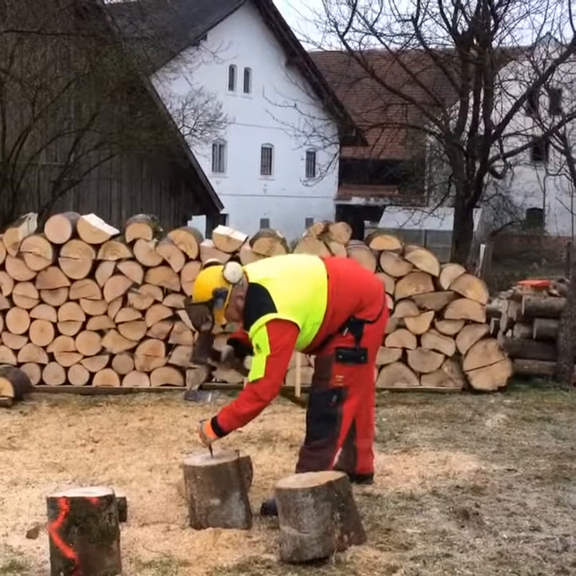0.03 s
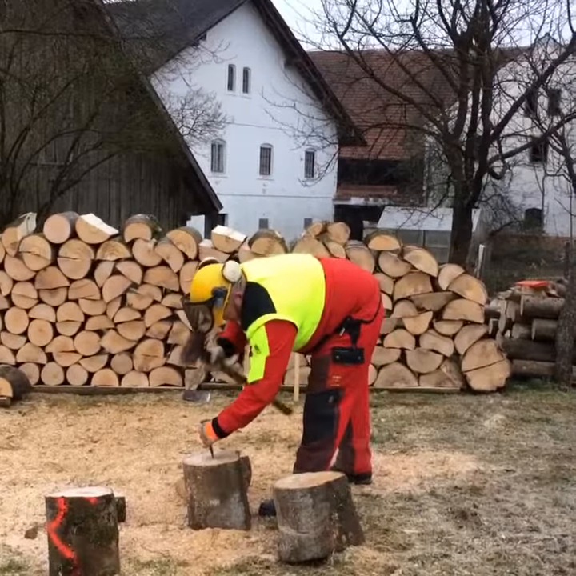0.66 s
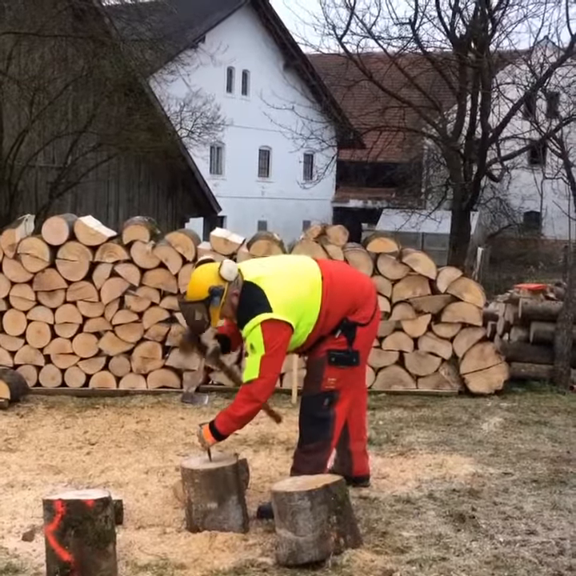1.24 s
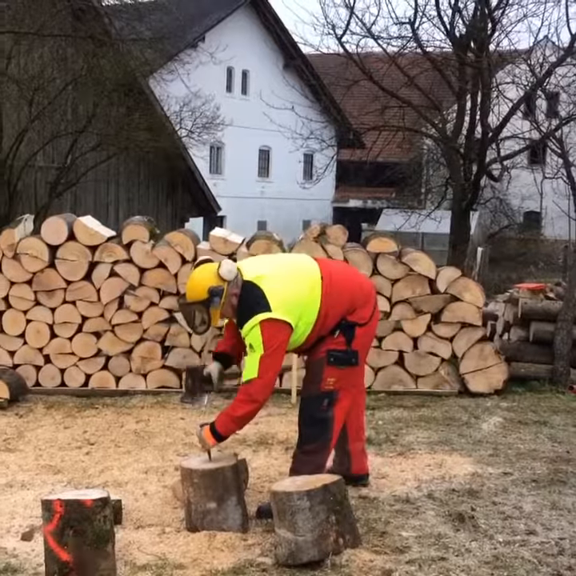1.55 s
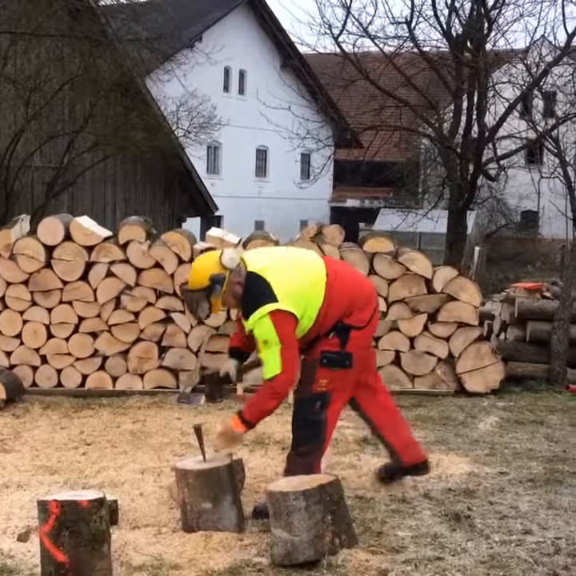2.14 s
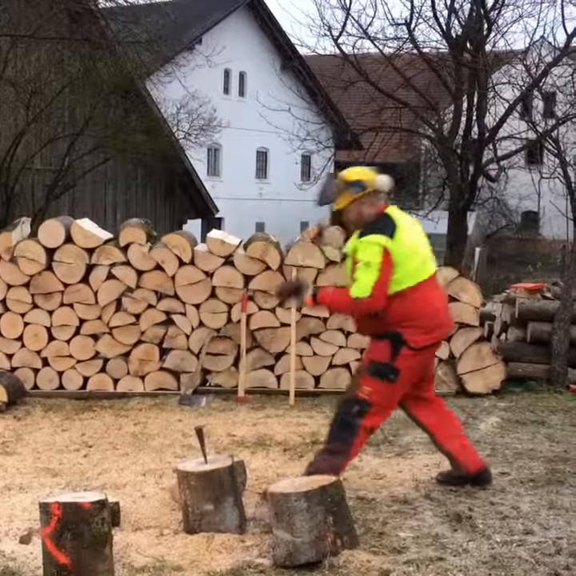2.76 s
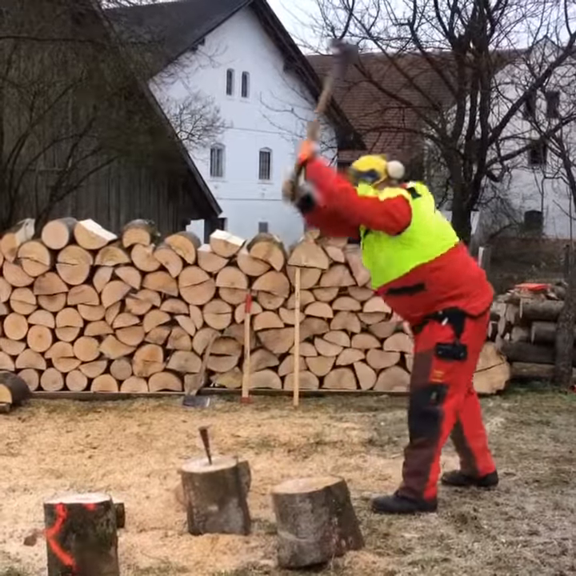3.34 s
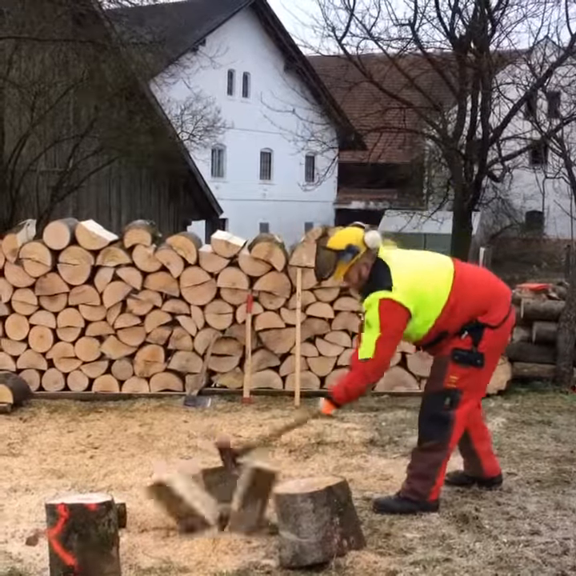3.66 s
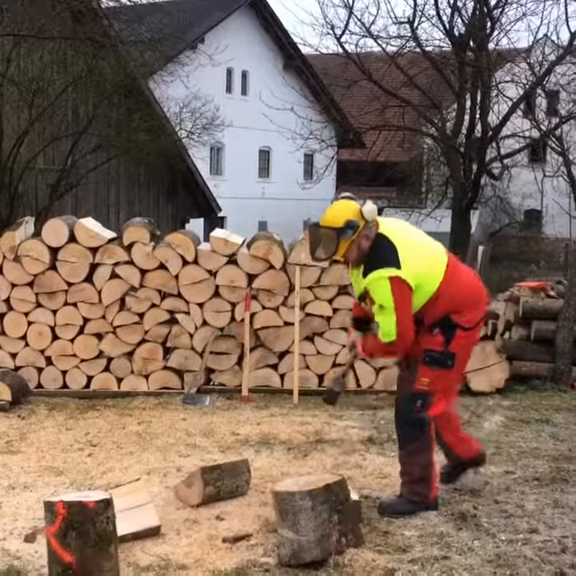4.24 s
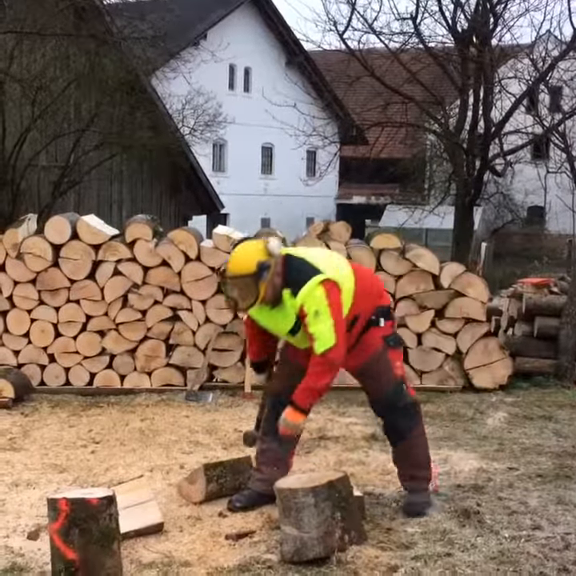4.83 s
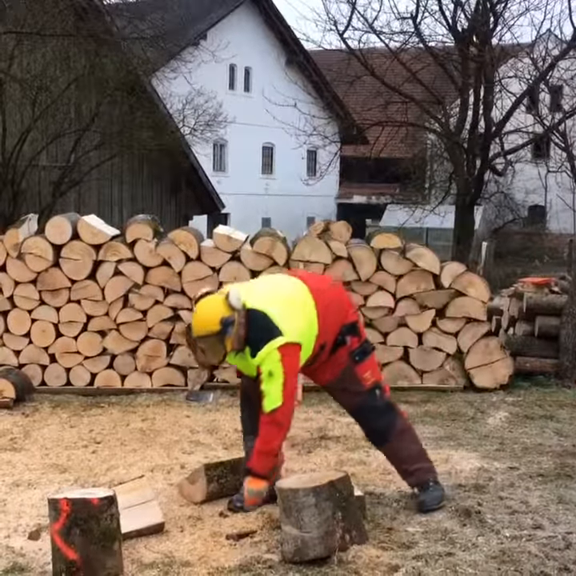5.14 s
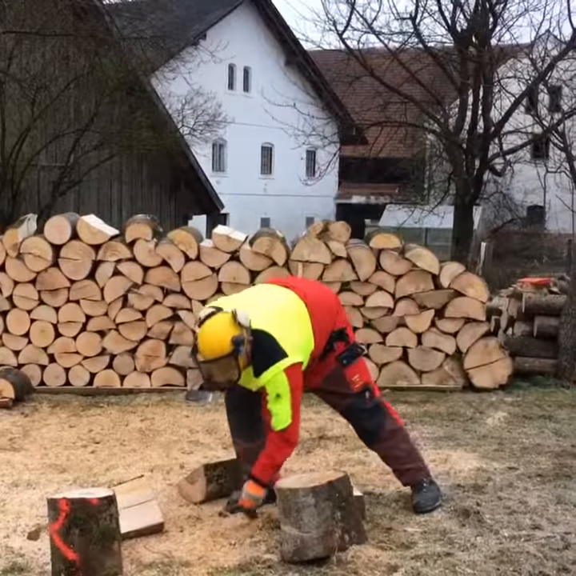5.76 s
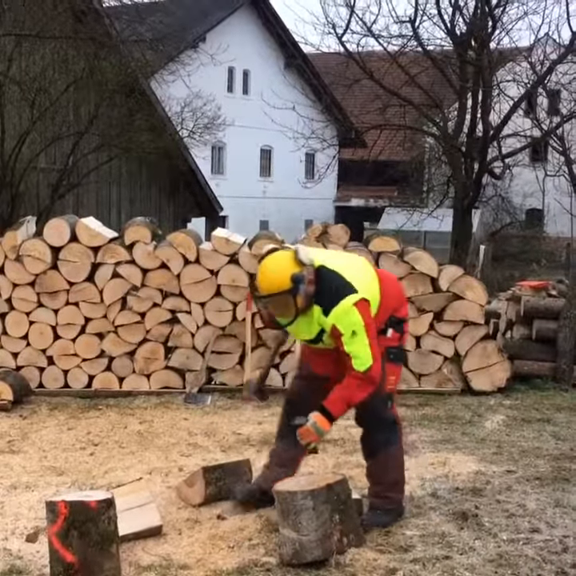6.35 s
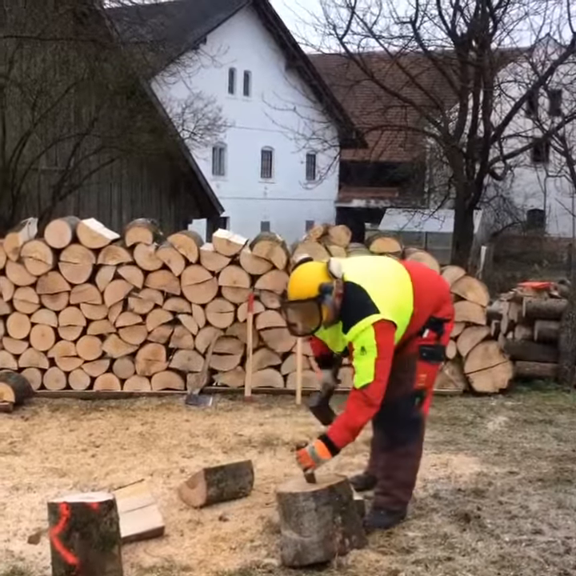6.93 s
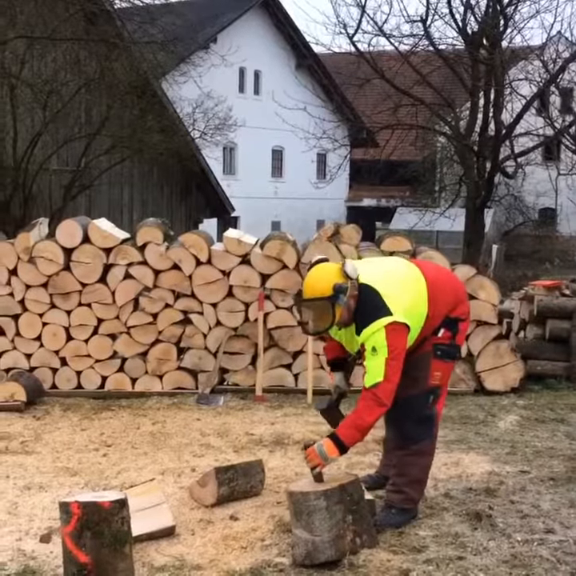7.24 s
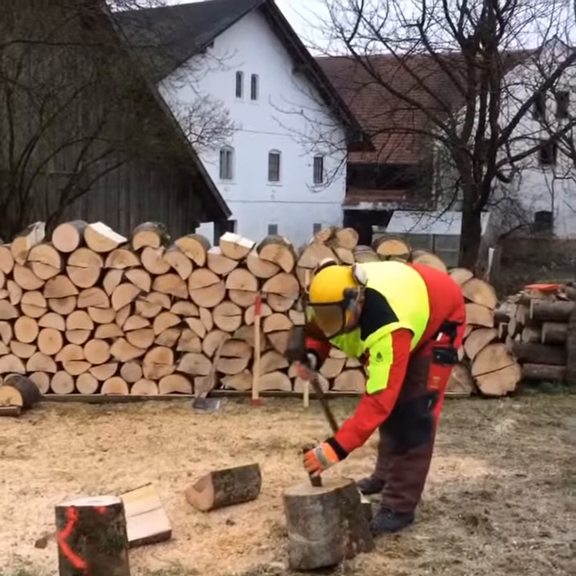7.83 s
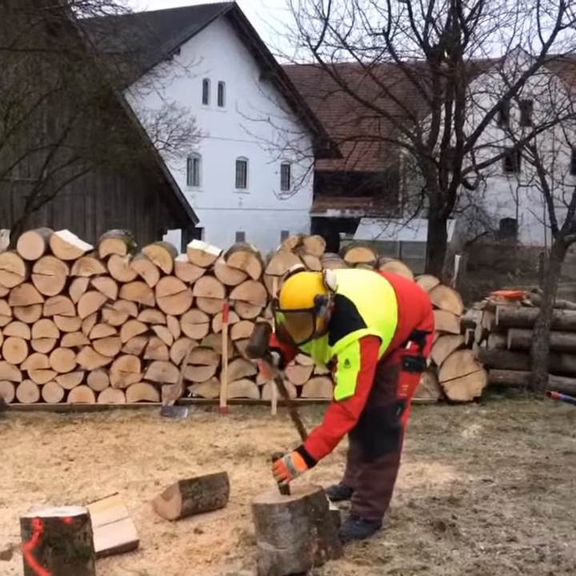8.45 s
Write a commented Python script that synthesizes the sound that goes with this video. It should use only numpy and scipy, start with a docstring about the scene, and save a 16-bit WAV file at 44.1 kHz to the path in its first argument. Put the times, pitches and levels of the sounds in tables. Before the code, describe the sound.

A hammer taps a steel wedge into a log with ringing clacks, then one heavy blow cracks the wood apart outdoors.

```python
"""Farmyard, beside a woodpile. A hammer taps a steel wedge into a log: each blow clacks and rings
the steel and thumps the wood. One full swing tears the fibres, the log booms and the wedge flies out
ringing. The halves tumble, boots shift on sawdust, and the wedge is set and struck on a second log.
The woodpile throws each blow straight back; farm buildings answer up to a third of a second later.
Under it all lie a faint rumble, a far roar and a hiss."""
import sys
import numpy as np
from scipy import signal
from scipy.fft import rfft, irfft, next_fast_len
from scipy.io import wavfile
from scipy.ndimage import uniform_filter1d

SR = 44100
rng = np.random.default_rng(int(sys.argv[2]) if len(sys.argv) > 2 else 0)


def pcm_store(signal):
    """Save signal as 16-bit PCM."""
    levels = np.round(np.clip(np.atleast_2d(signal), -1, 1) * 32767)
    wavfile.write(sys.argv[1], SR, levels.astype(np.int16).T)


N = 374409


def amp(db):
    """Decibels to gain."""
    return 10 ** (np.asarray(db) / 20)


def unit_rms(x):
    """Scale to rms 1."""
    return x / np.sqrt(np.mean(x ** 2) + 1e-20)


def spectrum_db(points, hz):
    """Spectrum interpolated over log frequency."""
    point_hz, db = np.transpose(points)
    return np.interp(np.log(hz + 1), np.log(point_hz + 1), db)


def add(mix, time_s, sound):
    """Mix a sound in at time_s."""
    part = mix[max(round(time_s * SR), 0):][:len(sound)]
    part += sound[:len(part)]


def noise(points):
    """Steady noise with the given spectrum, rms 1."""
    size = next_fast_len(N, True)
    gain = amp(spectrum_db(points, np.fft.rfftfreq(size, 1 / SR)))
    return unit_rms(irfft(rfft(rng.standard_normal(size)) * gain, size)[:N])


def grains(depth_db, samples):
    """Fast random gain that makes noise crackle."""
    jitter = unit_rms(uniform_filter1d(rng.standard_normal(N), size=samples))
    return unit_rms(amp(depth_db * jitter))


def minimum_phase(x, bin_db):
    """Causal filter; attacks stay sharp."""
    cepstrum = irfft(np.log(amp(bin_db)))
    cepstrum[1:len(x) // 2] *= 2
    cepstrum[len(x) // 2 + 1:] = 0
    return irfft(rfft(x) * np.exp(rfft(cepstrum)))


def flat_burst(envelope):
    """Enveloped noise, iterated toward a flat spectrum."""
    x = rng.standard_normal(len(envelope))
    envelope_rms = np.sqrt(np.mean(envelope ** 2))
    for _ in range(4):
        bins = rfft(x * envelope)
        white = unit_rms(irfft(bins / (abs(bins) + 1e-12)))
        x = np.tanh(white * envelope_rms / (envelope + 1e-6) / 2)
    return x * envelope


def ring(modes, rise_s):
    """Decaying modes with a soft onset."""
    t = np.arange(12000) / SR
    tones = sum(amp(db - 60 * t / t60_s) * np.sin(2 * np.pi * (hz * t + rng.random()))
                for hz, db, t60_s in modes)
    return tones * (1 - np.exp(-(t / rise_s) ** 2))


# Hammer blows: (time [s], impact gain [dB], wedge seating [0-1], bending note [Hz], its level [dB],
# upper note [Hz], its level [dB], woodpile delay [s])
BLOWS = [(0.2995, -10, 0.2, 1640, -27.5, 4420, -14, 0.017),
         (0.8710, -10, 0.58, 1292, -17, 4300, -19, 0.018), (1.4791, -8, 0.8, 1419, -15.5, 5160, -15, 0.018),
         (2.0194, -9, 0.97, 1512, -10, 4907, -13, 0.017),
         (3.6839, -8.5, 0.6, 1810, -22, 4661, -20.5, .0172),
         (8.0714, -8.5, 0.03, 1125, -25.5, 3735, -13, 0.018)]
# Modes: (frequency [Hz], level [dB], t60 [s])
STEEL_MODES = [(867, -21.5, 0.082), (1793, -15.5, 0.065), (3081, -9.5, 0.029), (3440, -19.5, .07),
               (4390, -17, 0.061), (6020, -22, .08), (7610, -17, .06), (7810, -22.5, 0.072),
               (8730, -24, 0.063), (9600, -26, .09), (13560, -26, .06), (12950, -26, .06)]  # hammer head and wedge
GRIPPED_MODES = [(966, -17, 0.033), (2350, -14, .035), (3040, -6, 0.021), (3480, -14, 0.025),
                 (4200, -12, .022), (5140, -7, .016), (5650, -15, 0.018)]  # wedge held by the wood
WHOLE_LOG_MODES = [(414, -35, .2), (856, -26.5, 0.16), (1087, -14, 0.044), (1480, -25, .1),
                   (1910, -25, .064), (2460, -18, .035), (2760, -21, .035), (3440, -11, 0.0325),
                   (3750, -18.5, .03), (4400, -17, .035)]  # second log with its loose wedge
def hammer():
    """Blows ring the steel and bend the wedge, which sounds two close notes and an upper one."""
    out = np.zeros(N)
    for time_s, db, seating, bend_hz, bend_db, upper_hz, upper_db, pile_delay_s in BLOWS:
        impact = ring(STEEL_MODES, rise_s=0.001) + seating * ring(GRIPPED_MODES, rise_s=0.001)
        add(impact, 0, amp(-1.5) * clack(seating))
        wedge_modes = [(bend_hz, bend_db, 0.083), (bend_hz * 1.08, bend_db - 5, 0.03),
                       (upper_hz, upper_db, 0.038)]
        notes = ring(wedge_modes, rise_s=0.0016)
        add(out, time_s, yard(amp(db) * impact + notes, pile_delay_s))
    add(out, BLOWS[-1][0], ring(WHOLE_LOG_MODES, rise_s=0.0031))
    return out


# Clack spectra, wedge loose and seated: (frequency [Hz], relative level [dB])
LOOSE_SPECTRUM = [(100, -22), (250, -26), (560, -10), (1100, -5), (1700, -3.5), (2200, -5), (2900, -6.5),
                  (3500, 1.5), (4300, 5), (4900, -7.5), (8000, -12), (10500, -20.5), (13000, -15),
                  (15500, -24)]
SEATED_SPECTRUM = [(100, -12), (350, -19.5), (600, -11.5), (900, -7), (1100, -12), (1600, 1), (2500, -6),
                   (3050, -0.5), (3800, -5.5), (5000, 3), (6000, -5.5), (9500, -8), (11000, -17.5),
                   (15500, -18.5)]
def clack(seating, contact_s=0.0032, fade_s=0.0021, size=4096):
    """Steel chatters on steel; the colour shifts as the wood grips the wedge."""
    t, hz = np.arange(size) / SR, np.fft.rfftfreq(size, 1 / SR)
    envelope = np.minimum(0.5 + t / contact_s, 1) * np.exp(-np.maximum(t - contact_s, 0) / fade_s)
    loose_db, seated_db = spectrum_db(LOOSE_SPECTRUM, hz), spectrum_db(SEATED_SPECTRUM, hz)
    chatter = minimum_phase(flat_burst(envelope), (1 - seating) * loose_db + seating * seated_db)
    return unit_rms(chatter) * np.sqrt(np.mean(envelope ** 2))


# Tearing fibres: (frequency [Hz], relative level [dB])
TEAR_SPECTRUM = [(40, -20.5), (180, 1), (300, -1), (600, 2), (800, -13), (1800, -4.5), (2600, -11.5),
                 (4000, -9), (8000, -11), (15000, -17.5)]
# Modes: (frequency [Hz], level [dB], t60 [s])
BOOM_MODES = [(66, -23, 0.099), (175, -22, .12), (232, -22, .12)]  # opening log and soil
FREE_WEDGE_MODES = [(7550, -1.5, 0.11), (7500, -13, 0.14), (7840, -12, .08), (9530, -17, .08),
                    (6260, -18, .09)]
def split(split_s=3.684, crack_s=0.058, freed_s=3.710, sag_db_per_s=185, release_db_per_s=480):
    """Fibres snap, fading fast once the crack is through; the log booms and the freed wedge rings."""
    age_s = np.arange(N) / SR - split_s
    sag_db = sag_db_per_s * np.clip(age_s, 0, crack_s)
    release_db = release_db_per_s * np.maximum(age_s - crack_s, 0)
    envelope = amp(-20 - sag_db - release_db) * (age_s >= 0)
    out = grains(depth_db=4, samples=60) * noise(TEAR_SPECTRUM) * envelope
    out += barn_echo(out)
    add(out, split_s, ring(BOOM_MODES, rise_s=0.004))
    add(out, freed_s, amp(-2) * ring(FREE_WEDGE_MODES, rise_s=0.0045))
    return out


# Log bursts, halves tumble, a boot lands, wedge is set on the next log: (time [s], level [dB], pitch [Hz], t60
# [s])
KNOCKS = [(3.684, -9.5, 259, .024), (3.717, -13, 390, .015), (3.736, -21, 983, 0.043),
          (3.748, -24, 406, .032), (3.820, -23.5, 186, .055), (3.932, -31, 125, .05),
          (4.826, -43, 729.6, 0.023), (6.884, -10, 469.3, 0.0073), (6.889, -34.5, 329, 0.058)]
def logs():
    """The first log thumps under each blow, heard via the woodpile; loose wood knocks about."""
    out = np.zeros(N)
    for time_s, db, *_, pile_delay_s in BLOWS[:-1]:
        add(out, time_s + pile_delay_s, thud(db - 13, pitch_hz=208, t60_s=0.031, grit_db=-20))
    for time_s, db, pitch_hz, t60_s in KNOCKS:
        add(out, time_s, thud(db, pitch_hz, t60_s, grit_db=-41))
    return out + amp(-7) * barn_echo(out)


def thud(db, pitch_hz, t60_s, grit_db, rattle_db=-13, rise_cycles=0.38, size=8192):
    """Heavily damped swing of wood or soil; a rattle near its pitch and crunching chips outlast it."""
    t, hz = np.arange(size) / SR, np.fft.rfftfreq(size, 1 / SR)
    decay_db = -60 * t / t60_s
    swing = np.sin(2 * np.pi * pitch_hz * t) * amp(decay_db)
    band = hz * pitch_hz / (hz ** 2 + pitch_hz ** 2) / (1 + (hz / (2 * pitch_hz)) ** 2)
    rattle = unit_rms(irfft(rfft(rng.standard_normal(size)) * band)) * amp(rattle_db + decay_db / 1.6)
    grit = rng.standard_normal(size) * amp(grit_db + decay_db / 2.6)
    onset = 1 - np.exp(-(t * pitch_hz / rise_cycles) ** 2)
    return amp(db) * (swing + rattle + grit) * onset


# Footfalls: (time [s], level [dB], pitch [Hz], relative crunch [dB])
STEPS = [(2.692, -24, 153, -44), (5.518, -30.5, 188, -39), (6.251, -35, 113.5, -16.5),
         (6.317, -34.5, 100, -31), (6.553, -45, 118, -16.5)]
def boots():
    """Soft ground thuds with a little sawdust crunch."""
    out = np.zeros(N)
    for time_s, db, pitch_hz, crunch_db in STEPS:
        add(out, time_s, thud(db, pitch_hz, t60_s=0.067, grit_db=crunch_db, rattle_db=-19))
    return out


# Lifted wedge: (frequency [Hz], level [dB], t60 [s])
CLINK_MODES = [(3790, -42.5, 0.049), (4420, -47, 0.018), (5270, -40.5, 0.017), (6420, -50, 0.037)]
def clink(time_s=6.252):
    """The fallen wedge rings lightly as it is picked up."""
    out = np.zeros(N)
    add(out, time_s, yard(ring(CLINK_MODES, rise_s=0.001), pile_delay_s=0.016))
    return out


# Brushing strokes: (centre time [s], length [s], level [dB])
SCUFFS = [(2.466, .08, -61), (3.01, 0.084, -62), (4.906, 0.16, -60.5), (6.061, .2, -64.5),
          (6.285, 0.062, -60), (6.372, .04, -64), (6.57, .07, -70)]
# Cloth and sawdust: (frequency [Hz], relative level [dB])
SCUFF_SPECTRUM = [(200, 2), (900, -1), (2200, -12), (3700, -1.5), (8000, -10), (15000, -13.5)]
def scuffs():
    """Boots and stiff work clothes brush in short grainy swishes."""
    t = np.arange(N) / SR
    strokes = sum(amp(db) * np.exp(-(2 * (t - centre_s) / length_s) ** 2)
                  for centre_s, length_s, db in SCUFFS)
    return strokes * grains(depth_db=5, samples=150) * noise(SCUFF_SPECTRUM)


# Scatter off log ends, then gaps: (rise [s], t60 [s], level [dB], low-pass [Hz])
WOODPILE = [(.001, .045, -12, 12020), (.002, .12, -13, 14070)]
# Sheds, house walls, barn, near to far: (delay [s], rise [s], t60 [s], level [dB], low-pass [Hz])
BUILDINGS = [(.049, 0.0018, .04, -22, 6000), (.05, .03, 1, -34.5, 5770), (.083, .003, .05, -31.5, 9000),
             (.141, .005, .14, -37.5, 6000), (.188, .003, .09, -40.5, 5000), (.252, .005, .12, -39, 4500),
             (.308, .02, .95, -24.5, 3000)]
def yard(sound, pile_delay_s, pile_face_db=-9.5):
    """Direct sound, a slap off the woodpile's face, its scatter and the building echoes."""
    response = sum(reflection(pile_delay_s, *row) for row in WOODPILE)
    response += sum(reflection(*row) for row in BUILDINGS)
    response[0] += 1
    add(response, pile_delay_s, amp([pile_face_db]))
    return signal.fftconvolve(sound, response)


def barn_echo(sound):
    """Return from the farthest wall only."""
    return signal.fftconvolve(sound, reflection(*BUILDINGS[-1]))[:N]


def reflection(delay_s, rise_s, t60_s, db, lowpass_hz):
    """Rough-surface response: a dulled cloud of small echoes that swells and dies."""
    age_s = np.maximum(np.arange(SR) / SR - delay_s, 0)
    cloud = rng.standard_normal(SR) * (1 - np.exp(-age_s / rise_s)) * amp(-60 * age_s / t60_s)
    lowpass = signal.butter(2, lowpass_hz, fs=SR)
    return amp(db) * signal.lfilter(*lowpass, unit_rms(cloud) / np.sqrt(SR))


# Outdoor swells: (time [s], roar gain [dB], hiss gain [dB])
SWELLS = [(0.0, -70.5, -75), (2.08, -72.5, -72.5), (2.2, -70, -67), (2.69, -64.5, -67.5),
          (3.57, -62.5, -65.5), (3.69, -58.5, -59.5), (4.07, -62, -63.5), (4.42, -67.5, -71.5),
          (4.94, -65, -68), (5.58, -70.5, -72.5), (6.62, -66, -71), (7.14, -70, -75.5), (8.49, -68, -73)]
# Outdoor noise spectra: (frequency [Hz], relative level [dB])
RUMBLE_SPECTRUM = [(20, -27), (40, -14), (65, 3.5), (100, -4.5), (160, -7), (250, -20), (400, -33),
                   (1000, -61.5)]
ROAR_SPECTRUM = [(100, -9), (250, 0.5), (500, -0.5), (1050, -1), (1600, -5), (2400, -11), (4000, -18.5),
                 (9000, -41)]
HISS_SPECTRUM = [(500, -9.5), (2000, 0), (3500, 4), (5000, 0.5), (8000, -2), (12000, -5.5), (15000, -5.5),
                 (15500, -26)]
def background():
    """Low rumble under a far roar and a hiss that slowly swell and sink."""
    t = np.arange(N) / SR
    time_s, roar_db, hiss_db = np.transpose(SWELLS)
    rumble = amp(-61) * waver(depth_db=2.5) * noise(RUMBLE_SPECTRUM)
    roar = amp(np.interp(t, time_s, roar_db) + 1.5) * waver(depth_db=0.74) * noise(ROAR_SPECTRUM)
    hiss = amp(np.interp(t, time_s, hiss_db) + 2) * waver(depth_db=1.5) * noise(HISS_SPECTRUM)
    return rumble + roar + hiss


def waver(depth_db):
    """Random gain drift, 1-10 Hz."""
    t = np.arange(0, N, 256) / SR
    drift = sum(np.sin(2 * np.pi * (hz * t + rng.random())) for hz in np.geomspace(1, 10, 24))
    return amp(depth_db * np.interp(np.arange(N) / SR, t, unit_rms(drift)))


def scene():
    """All sources, mono."""
    return (hammer() + split() + logs() + boots() + clink() + scuffs() + background())[None]


def record(dry):
    """Soft peak limiting, then a 15.8 kHz low-pass."""
    rounded = dry / (1 + dry ** 6) ** (1 / 6)
    lowpass = signal.firwin(301, 15800, window=("kaiser", 9), fs=SR)
    return signal.oaconvolve(rounded, lowpass[None], "same")


dry = scene()
out = record(dry)
pcm_store(out)
```